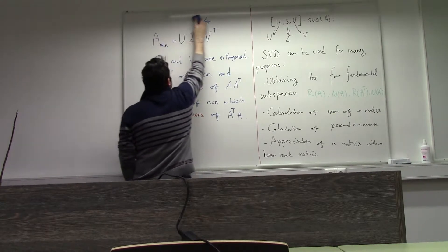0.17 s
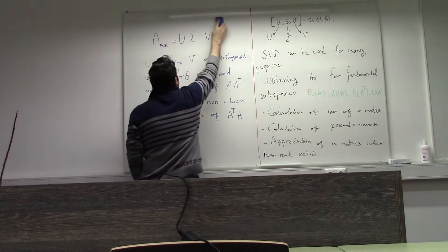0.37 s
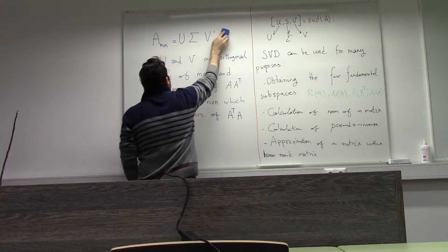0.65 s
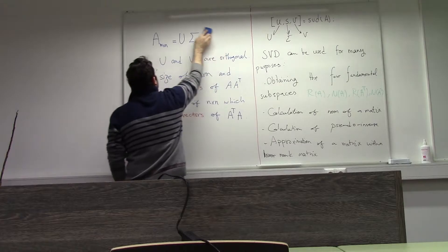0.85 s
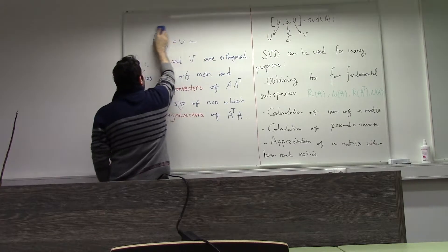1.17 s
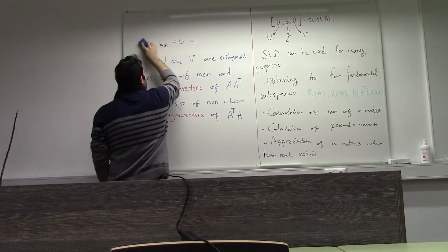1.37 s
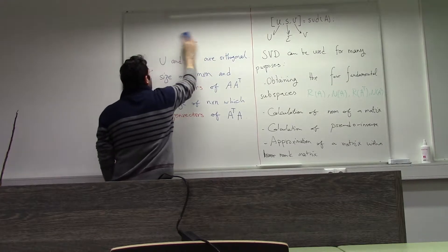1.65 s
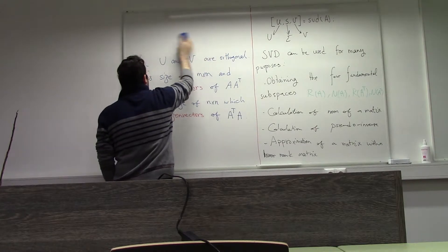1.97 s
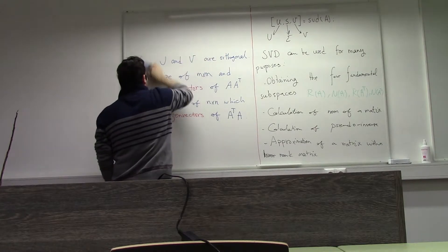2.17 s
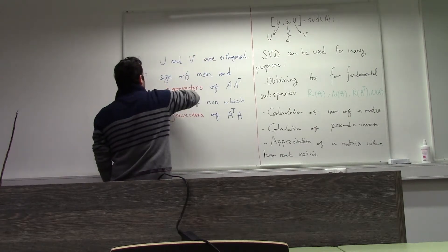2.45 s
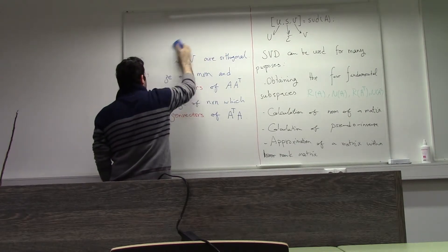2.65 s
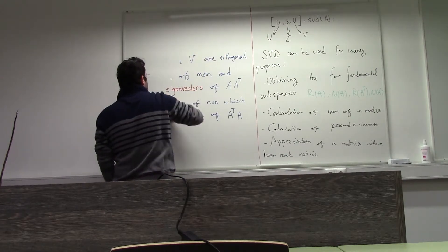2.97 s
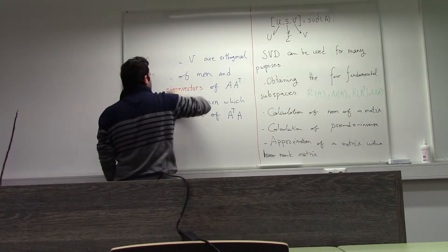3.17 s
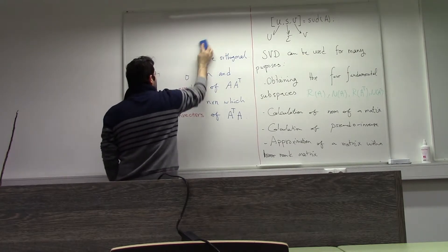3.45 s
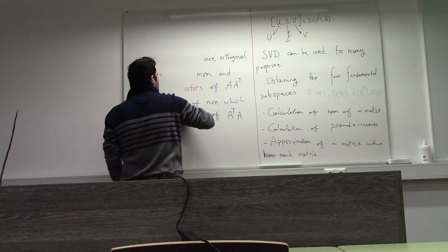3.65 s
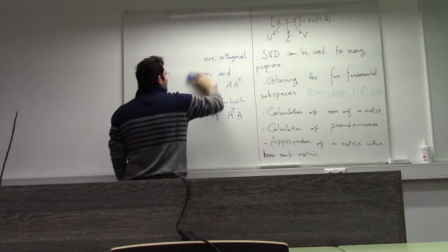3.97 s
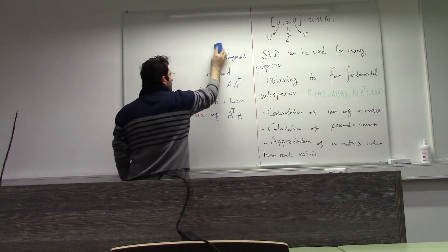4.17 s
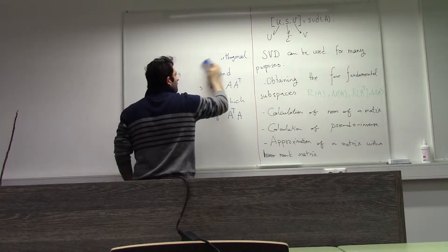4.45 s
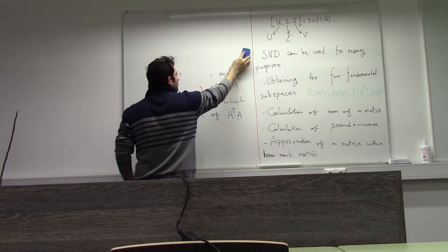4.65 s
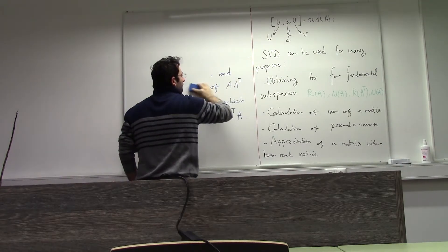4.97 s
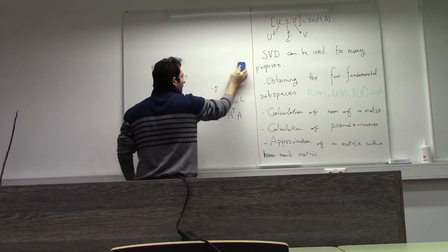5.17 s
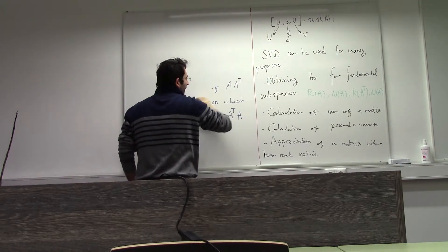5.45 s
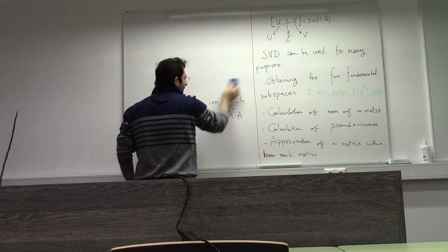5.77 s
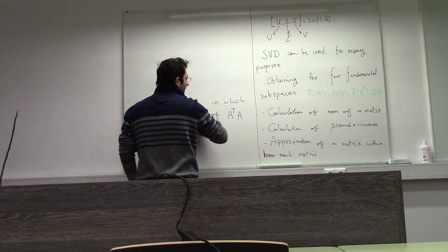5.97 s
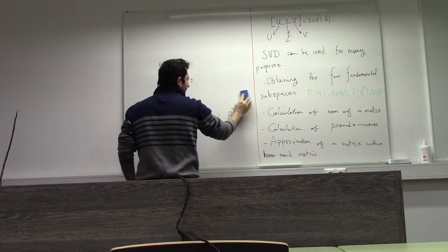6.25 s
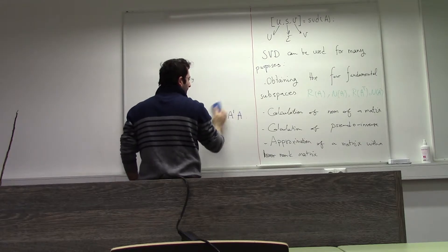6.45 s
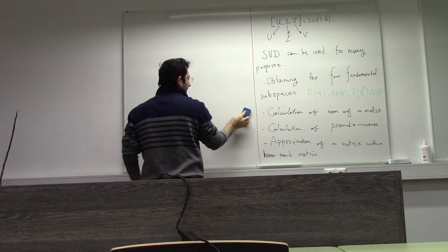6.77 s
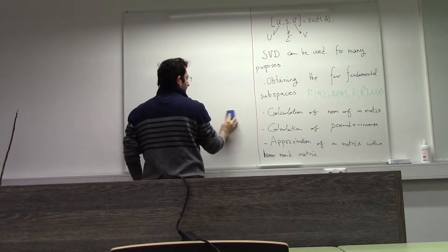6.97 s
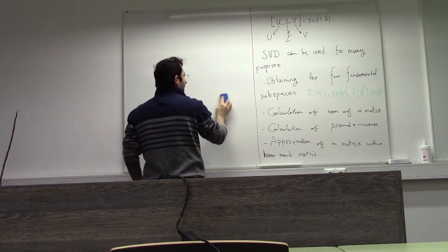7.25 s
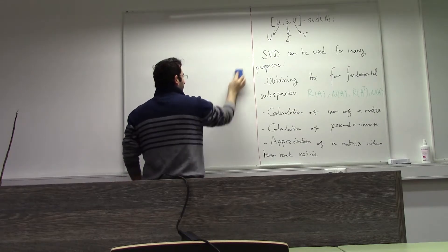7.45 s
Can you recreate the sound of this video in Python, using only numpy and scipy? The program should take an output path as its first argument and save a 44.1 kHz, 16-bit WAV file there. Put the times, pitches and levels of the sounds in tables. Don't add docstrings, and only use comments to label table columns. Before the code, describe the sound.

A felt eraser swishes back and forth across a whiteboard over soft ventilation hum, then one sharp loud snap near the end.

```python
import sys
import numpy as np
from scipy import signal
from scipy.fft import rfft, irfft, next_fast_len
from scipy.io import wavfile
from scipy.ndimage import uniform_filter1d, map_coordinates

SR = 44100
rng = np.random.default_rng(int(sys.argv[2]) if len(sys.argv) > 2 else 0)


def invert_db(level):
    return 10 ** (np.asarray(level, dtype=float) / 20)


def waveform_to_disk(signal):
    frames = np.transpose(np.atleast_2d(signal))
    scaled = np.clip(frames, -1, 1) * 32767
    samples = np.round(scaled).astype(np.int16)
    wavfile.write(sys.argv[1], SR, samples)


N = 335447
TOP_HZ = 15720

# [turn t/s, full-speed hiss level/dB, place of full speed/0-1, pressure level/dB, sheen level/dB]
SWEEPS = [(-.3, -57.5, 0.7, 0.5, -2), (.48, -64, 0.2, 3, 0), (.69, -58.5, 0.57, 1.5, -3),
          (1.52, -56, 0.6, -2, -1.5), (1.91, -56, 0.58, -2.5, -2), (2.48, -55, 0.63, -3.5, 1),
          (2.81, -54, .55, -4.5, -2), (3.15, -55, 0.66, -2, 1.5), (3.5, -54.5, 0.5, -3, -1),
          (3.87, -54, 0.65, -3.5, 0), (4.24, -56.5, 0.67, -2, -1.5), (4.46, -56.5, 0.49, 0.5, 1),
          (4.75, -56, 0.61, 0.5, 0), (5.06, -55.5, 0.58, -0.5, 3), (5.27, -54, 0.52, 0.5, 0.5),
          (5.54, -55.5, 0.54, 2, 3), (5.78, -56.5, 0.42, 2.5, 1.5), (6.08, -55, 0.67, 0, 1),
          (6.405, -58, .48, 2.5, 1.5), (6.64, -58, 0.51, 1.5, 2.5), (6.845, -61.5, 0.57, 3, 2.5),
          (7.018, -64.5, 0.56, 10, 0), (7.18, -56.5, 0.62, 4.5, -3), (7.35, -59, 0, -1, 2)]


def eraser():
    # [f/Hz, level/dB per Hz]
    felt_colour = [(1000, -1), (1900, 0), (2500, -0.5), (3100, 4.5), (3400, 3), (3900, -1), (5000, -4.5),
                   (5600, -3.5), (6300, -5), (7300, -6.5), (8800, -11), (11200, -14.5), (13500, -21.5),
                   (15700, -28)]
    *_, pressure_db, sheen_db = np.transpose(SWEEPS)

    def felt(f):
        return invert_db(along(felt_colour, f)) * f ** 2 / (f ** 2 + 1500 ** 2)

    def low(f, edge_hz):
        return 1 / (1 + (f / edge_hz) ** 4)

    drag = rush(lambda f: felt(f) * low(f, 4240), patchy_db=0.3)
    hiss = rush(lambda f: felt(f) * (1 - low(f, 3750)) * low(f, 8740), patchy_db=1.0)
    sheen = rush(lambda f: felt(f) * (1 - low(f, 7400)), patchy_db=0.7)
    sheen_over_hiss_db = -7
    drag_level = sweeps(shift=0.023, rounding=0.65, db=pressure_db - 3.0, carry_db=1)
    hiss_level = sweeps(shift=0, rounding=0.8, db=0, carry_db=0)
    sheen_level = sweeps(shift=-0.083, rounding=1, db=sheen_over_hiss_db + sheen_db,
                         carry_db=sheen_over_hiss_db)
    catch = invert_db(0.45 * wobble(9) + 0.25 * wobble(300))
    return catch * (drag_level * drag + hiss_level * hiss + sheen_level * sheen)


def sweeps(shift, rounding, db, carry_db):
    # [t/s, level/dB]
    turn_hiss = [(0, -63.5), (.5, -64.5), (.7, -68.5), (2.5, -69), (4.8, -66.5), (5.1, -63.5), (6.5, -63.5),
                 (6.85, -66.5), (7.6, -62.5)]
    last_turn_s, usual_s = 7.78, 0.33
    s, top_db, place, *_ = np.transpose(SWEEPS)
    t = np.arange(N) / SR
    length = np.diff(np.append(s, last_turn_s))
    k = np.clip(np.searchsorted(s, t) - 1, 0, len(s) - 1)
    warp = np.log(0.5) / np.log(np.clip(place + shift, 0.1, 0.9))
    u = np.clip((t - s[k]) / length[k], 0, 1) ** warp[k]
    pointed = rounding * (usual_s / length[k]) ** 0.6
    swell = invert_db(top_db + db)[k] * np.abs(np.sin(np.pi * u)) ** pointed
    return np.hypot(swell, invert_db(curves(turn_hiss)[0] + carry_db))


def board():
    # [t/s, peak level/dB, f/Hz]
    jolts = [(2.625, -42.5, 174), (3.46, -39, 249), (3.554, -39.5, 323), (3.585, -37.5, 416),
             (3.6, -37, 241), (3.62, -36.5, 213), (3.639, -37, 267), (3.646, -38, 343), (3.724, -33, 200),
             (4.665, -31.5, 156), (4.691, -34, 317), (4.702, -31.5, 213), (4.74, -38, 225),
             (4.779, -35, 206), (4.785, -38, 270), (4.815, -40, 230), (5.83, -35.5, 210), (7.39, -32, 181)]
    out = np.zeros(N + SR)
    t = np.arange(SR // 8) / SR
    swell = t / 0.015 * np.exp(1 - t / 0.007)
    for s, db, hz in jolts:
        out[round(s * SR):][:len(t)] += invert_db(db) * swell * np.sin(2 * np.pi * hz * t)
    return out[:N]


def scuff():
    # [t/s, level/dB, centre f/Hz]
    scrape = [(6.1, -59, 1537), (6.188, -69, 1450), (6.194, -55, 1378), (6.232, -52.5, 1380),
              (6.286, -48.5, 2194), (6.338, -52.5, 2450), (6.438, -64, 1840), (6.45, -62, 1896)]
    db, hz, gate = curves(scrape)
    grain = rng.standard_normal((2, N)) * invert_db(2.1 * wobble(120))
    rough = filtered(grain, lambda f: 1 / (1 + (f / 700) ** 2))
    phase = 2 * np.pi * np.cumsum(hz) / SR
    note = rough[0] * np.sin(phase) + rough[1] * np.cos(phase)
    return invert_db(db - 1.5) * gate * unit(note)


def slide():
    # [t/s, level/dB]
    slide_path = [(6.924, -59.5), (7.148, -48), (7.172, -53), (7.198, -45.5), (7.314, -49), (7.39, -43.5),
                  (7.44, -49), (7.596, -62)]
    # [f/Hz, width/Hz, level/dB]
    desk_modes = [(900, 640, 0), (1450, 360, 2), (1840, 180, 5.5), (2350, 210, 3.5), (2720, 330, 0),
                  (3100, 370, -23)]
    db, gate = curves(slide_path)
    grain = invert_db(2.1 * wobble(60)) * rush(modes(desk_modes), patchy_db=1.0)
    return invert_db(db - 1.5) * gate * unit(grain)


def ticks():
    # [t/s, peak level/dB, centre f/Hz, width/Hz]
    small_contacts = [(0.719, -45, 3640, 600), (.719, -48, 2650, 400), (.725, -50, 2680, 400),
                      (.733, -52, 2600, 300), (1.045, -44, 3260, 500), (1.046, -48, 1990, 600),
                      (1.049, -46, 3720, 400), (1.057, -47, 3420, 400), (1.064, -49, 3200, 400),
                      (1.105, -53, 3270, 250), (2.35, -46, 2010, 400), (3.206, -44.5, 2190, 1000),
                      (5.8332, -35.5, 1900, 1200), (5.84, -46, 1800, 400), (5.84, -45, 3100, 600),
                      (6.195, -43, 1360, 300), (7.041, -42, 2500, 1000), (7.166, -42, 900, 700),
                      (7.2005, -35, 2000, 1500), (7.259, -36, 700, 600), (7.268, -37.5, 530, 200),
                      (7.569, -38, 1000, 700), (7.57, -37, 400, 300)]
    out = np.zeros(N + SR)
    t = np.arange(SR // 20) / SR
    for s, db, hz, width_hz in small_contacts:
        u = np.pi * width_hz * t
        out[round(s * SR):][:len(t)] += invert_db(db + 1.5) * u * np.exp(1 - u) * np.sin(2 * np.pi * hz * t)
    return out[:N]


def snap():
    # [t/s, peak level/dB]
    snap_event = (7.3926, -11.5)
    # [f/Hz, level/dB]
    snap_colour = [(50, -15), (180, -2), (450, 3.5), (950, -7), (1350, 1), (1800, 2.5), (2450, -5),
                   (3300, -15.5), (4800, -13), (6500, -15), (8400, -20), (10300, -48), (13500, -42),
                   (15200, -40)]
    # [delay t/s, level/dB]
    spring_back = (0.00052, -2.3)
    s, db = snap_event
    delay_s, rebound_db = spring_back
    pulse = causal(snap_colour)
    blow = np.zeros(N)
    blow[round(s * SR):][:len(pulse)] = -pulse
    both = filtered(blow, lambda f: 1 - invert_db(rebound_db) * np.exp(-2j * np.pi * f * delay_s))
    return invert_db(db) * both / np.abs(both).max()


def room(x):
    # [delay t/s, level/dB]
    walls = [(.0075, -16), (.0084, -22), (.012, -24), (.022, -24), (.031, -27)]
    # [f/Hz, T60 t/s]
    decay = [(200, 0.32), (2000, 0.26), (10000, 0.31)]
    hz, t, z = signal.stft(rng.standard_normal((2, SR // 2)), SR, nperseg=256)
    tail = signal.istft(z * invert_db(-60 * t / along(decay, hz)[:, None]), SR, nperseg=256)[1]
    tail = tail / np.linalg.norm(tail[0])
    late = signal.fftconvolve(np.pad(x, (300, 0))[None], tail, axes=1)[:, :N]
    early = filtered(x, lambda f: sum(invert_db(db) * np.exp(-2j * np.pi * f * s) for s, db in walls))
    return early + invert_db(-18.5) * late


def ventilation():
    # [f/Hz, level/dB per Hz]
    air_colour = [(15, -50), (25, -29), (64, -11.5), (102, -11.5), (152, -1.5), (241, -0.2), (424, -4),
                  (602, -9.5), (809, -14), (2380, -21.5), (6110, -31), (11200, -39), (11700, -39.5),
                  (15700, -48)]
    # [f/Hz, width/Hz, level over the air/dB]
    duct = [(57, 11, 9), (105.7, 4.8, 5.5), (111, 12, 1), (239, 8.1, 2.5), (313, 11, 4.5), (508, 21, 3.5),
            (586.5, 8.8, 8.5), (638, 7.1, -0.5)]
    # [f/Hz, rms level/dB]
    fan_tones = [(57, -72), (99, -66.5), (113, -61.5), (247.6, -59), (495.3, -63.5), (587, -71),
                 (640, -69.5)]

    def peaks(f):
        return 1 + sum((invert_db(db) - 1) / (1 + (2 * (f - c) / w) ** 2) for c, w, db in duct)

    air = rush(lambda f: invert_db(along(air_colour, f)) * peaks(f), patchy_db=-0.04)
    t = np.arange(N) / SR
    hum = np.zeros(N)
    for hz, db in fan_tones:
        phase = 2 * np.pi * hz * t + 0.35 * wobble(4.03)
        hum += np.sqrt(2) * invert_db(db + 1.1 * wobble(3.02)) * np.sin(phase)
    return invert_db(-48.42 + 0.1 * wobble(3.29)) * air + hum


def rush(response, patchy_db):
    # [f/Hz, likeness/0-1]
    likeness = [(60, 0.98), (120, 0.98), (240, 0.97), (480, 0.94), (950, 0.82), (1890, 0.87), (3770, 0.9),
                (7520, 0.88), (15000, 0.87)]
    z = signal.stft(rng.standard_normal((2, N)), nperseg=512)[2]
    field = uniform_filter1d(rng.standard_normal(z.shape[1:]), 6, 0)
    field = uniform_filter1d(field, 12, 1)
    pair = signal.istft(z * invert_db(patchy_db * unit(field)), nperseg=512)[1][:, :N]

    def mid_side(hz):
        angle = np.arccos(np.clip(along(likeness, hz), -1, 1)) / 2
        return response(hz) * (hz < TOP_HZ) * np.array([np.cos(angle), np.sin(angle)])

    mid, side = filtered(pair, mid_side)
    return unit(np.array([mid + side, mid - side]))


def modes(table):
    def response(f):
        return sum((-1) ** k * invert_db(db) * 1j * f * w / (c * c - f * f + 1j * f * w)
                   for k, (c, w, db) in enumerate(table))
    return response


def causal(points):
    cep = irfft(np.log(invert_db(along(points, np.fft.rfftfreq(4096, 1 / SR)))))
    cep[1:2048] *= 2
    cep[2049:] = 0
    return irfft(np.exp(rfft(cep)))


def filtered(x, response):
    m = next_fast_len(N + SR // 2)
    return irfft(rfft(x, m) * response(np.fft.rfftfreq(m, 1 / SR)), m)[..., :N]


def wobble(rate):
    knots = rng.standard_normal(int(N * rate / SR) + 4)
    return map_coordinates(knots, [np.arange(N) * rate / SR])


def curves(rows):
    s, *cols = np.transpose(rows)
    t = np.arange(N) / SR
    gate = np.clip(np.minimum(t - s[0], s[-1] - t) / 0.034 + 1, 0, 1)
    return [np.interp(t, s, c) for c in cols] + [gate]


def along(points, hz):
    f, v = np.transpose(points)
    return np.interp(np.log(hz + 1), np.log(f + 1), v)


def unit(x):
    return x / np.sqrt(np.mean(x ** 2) + 1e-20)


def scene():
    hits = ticks() + snap() + board()
    direct = hits * invert_db(0.3 * np.array([[1], [-1]]))
    return eraser() + scuff() + slide() + direct + room(hits) + ventilation()


def low_pass(x):
    return signal.sosfilt(signal.butter(12, 16440, fs=SR, output="sos"), x)


def record(dry):
    # [f/Hz, left minus right level/dB]
    balance = [(60, -0.5), (130, -0.5), (290, -0.5), (640, -1.0), (1410, -0.5), (3100, -0.5), (6820, 0.0),
               (15000, 0.0)]

    def sensitivity(f):
        lean_db = along(balance, f) / 2 * np.array([[1], [-1]])
        return invert_db(lean_db - 20 * (f > TOP_HZ))

    return low_pass(filtered(dry, sensitivity))


dry = scene()
out = record(dry)
waveform_to_disk(out)
```